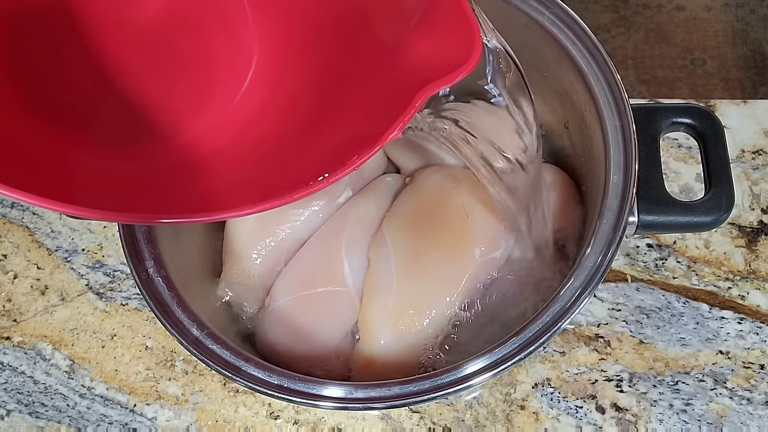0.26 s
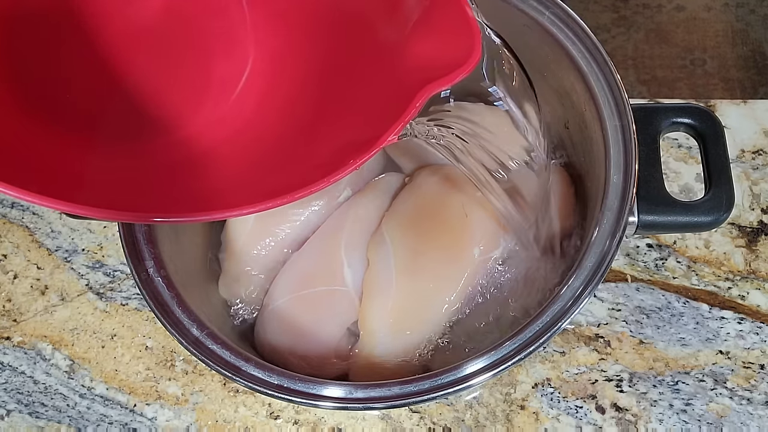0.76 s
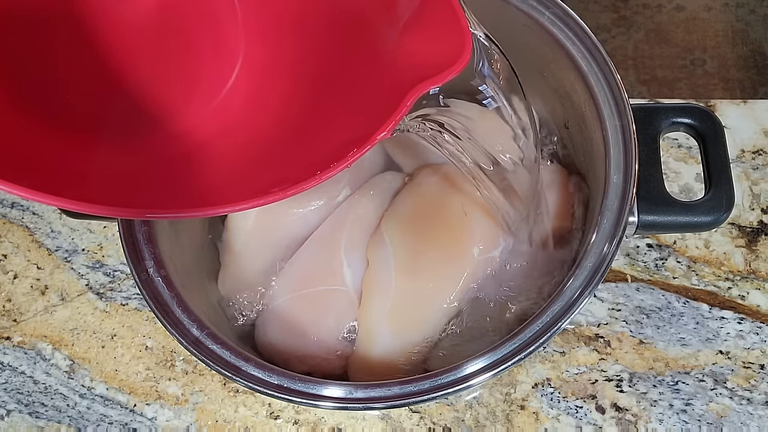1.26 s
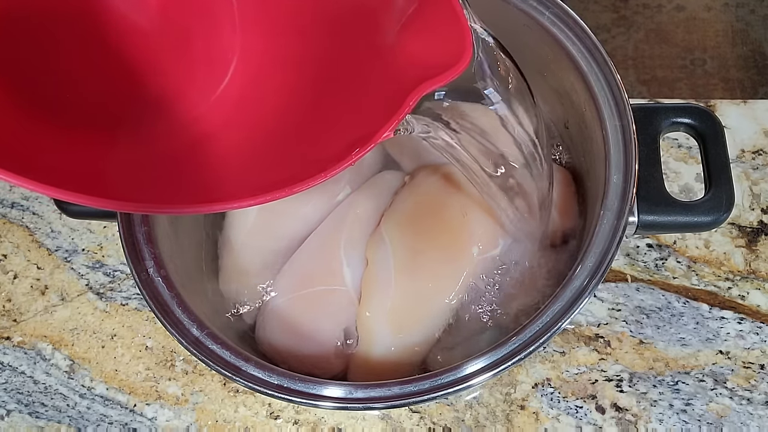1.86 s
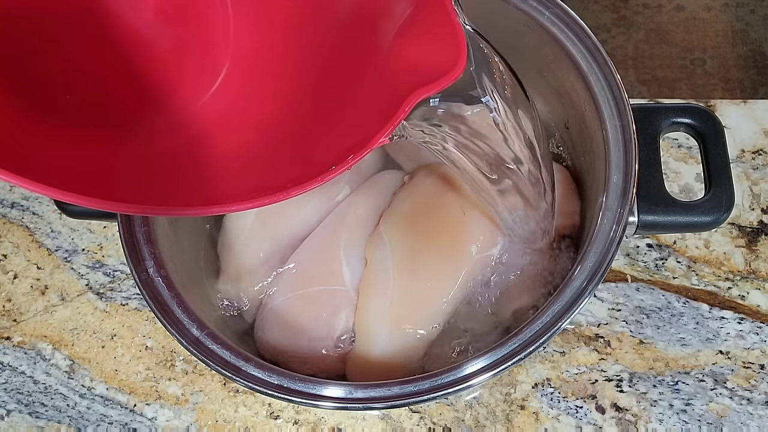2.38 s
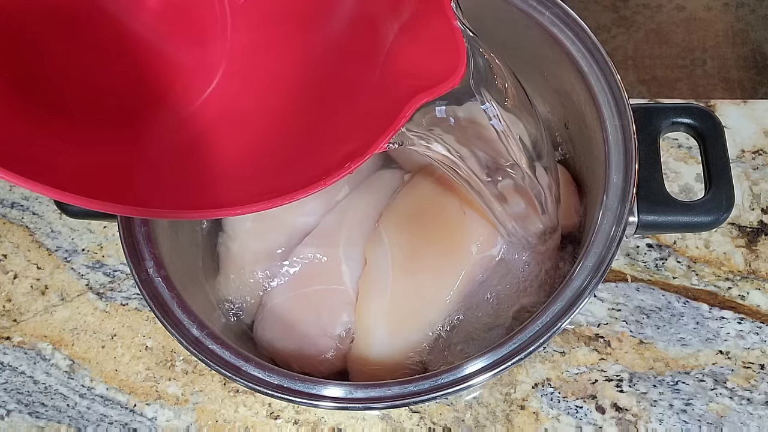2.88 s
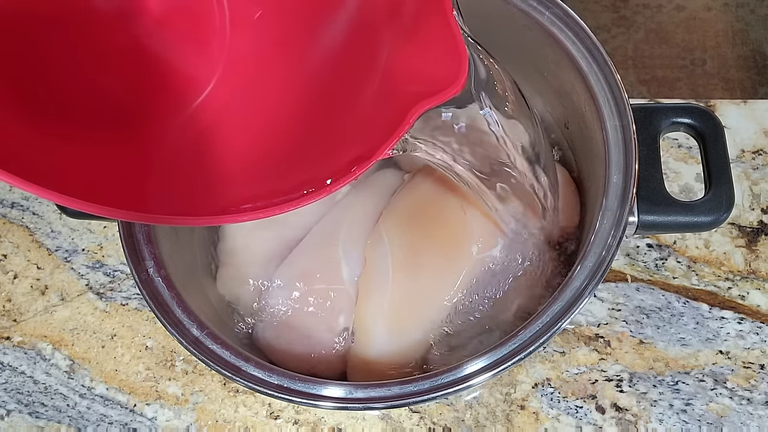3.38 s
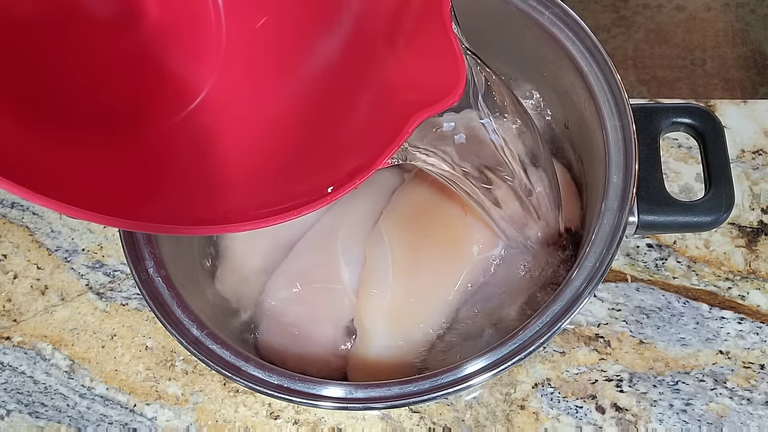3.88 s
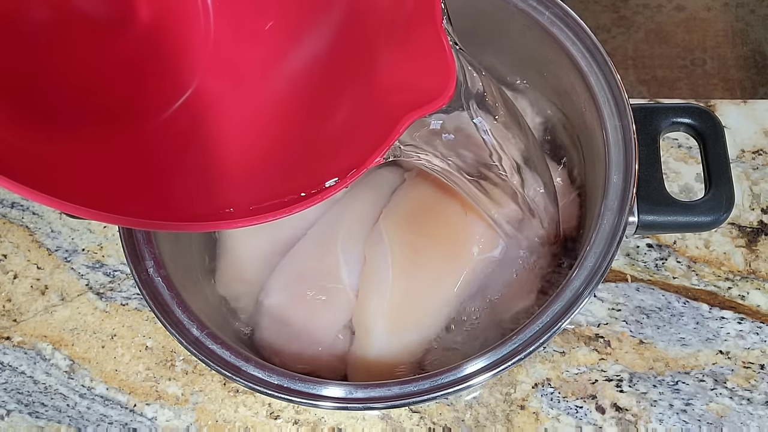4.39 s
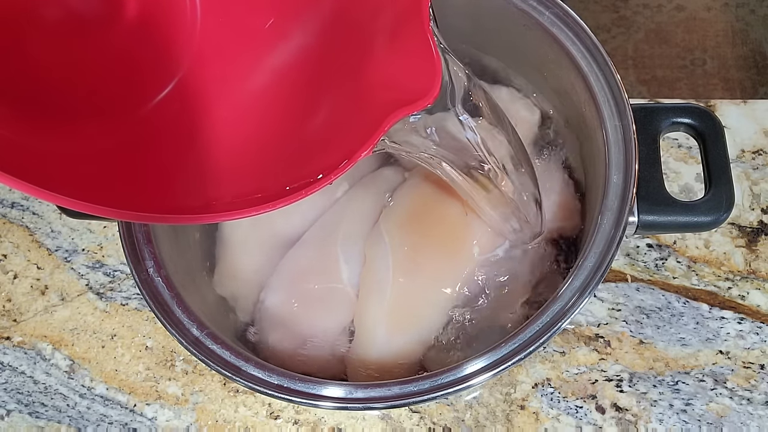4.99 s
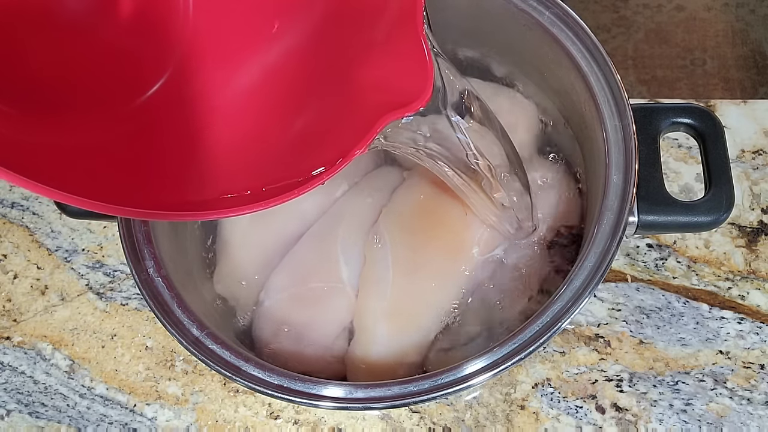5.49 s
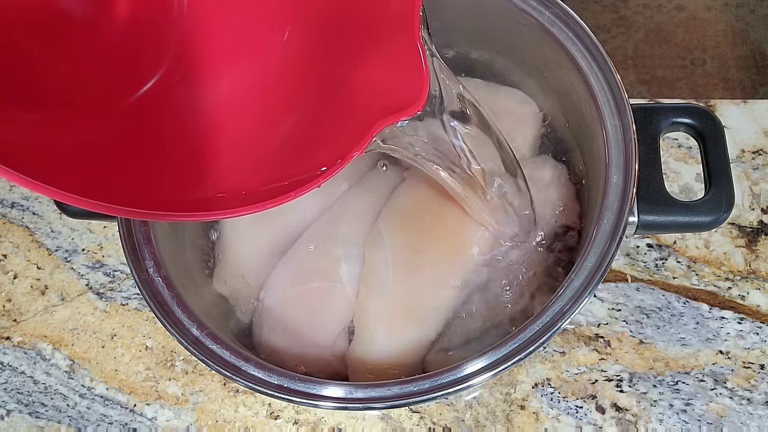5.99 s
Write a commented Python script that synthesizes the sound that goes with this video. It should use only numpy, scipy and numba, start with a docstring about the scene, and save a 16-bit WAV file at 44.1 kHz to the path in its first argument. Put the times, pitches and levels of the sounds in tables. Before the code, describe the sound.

Close-up pouring water, already running at the start, strikes meat and metal with crisp splatter and glassy bubble chirps. Over six seconds it calms in uneven surges to a smoother, quieter trickle with light gurgling, then swells slightly at the end. The pot adds a hollow, metallic colouring with short reflections. Behind it are a steady low electrical hum and soft room air, picked up by a nearby phone.

```python
"""Water pours from a plastic bowl over raw chicken into a steel stockpot near a phone; a hum runs throughout.
At first it strikes hard: bubbles ring as damped sines with bright plinks, spray fizzes as tiny high rings,
and drops tick as noise. As the pot fills, its air adds gliding resonances, gliding dips thin the splash, and
the wall scatters it as echoes. It softens as the water deepens; low bubbles churn where the stream folds under.
Near the end come two dull plops of escaping air. Steady sines make the hum, and shaped noise the kitchen air."""
import sys
import numpy as np
from scipy import signal
from scipy.fft import rfft, irfft
from scipy.io import wavfile
from scipy.ndimage import uniform_filter1d, map_coordinates
from numba import njit

SR = 44100
rng = np.random.default_rng(int(sys.argv[2]) if len(sys.argv) > 2 else 0)


def generate_wav(sig):
    """Save sig (samples, or channels by samples) to the path in sys.argv[1] as 16-bit PCM at SR."""
    pcm = np.round(np.clip(np.atleast_2d(sig).T, -1, 1) * 32767).astype(np.int16)
    wavfile.write(sys.argv[1], SR, pcm)


N = 275625
TIME = np.arange(N) / SR

# Levels are relative: the source functions and the pot scale them further.
# How hard the stream strikes, strongest at first, easing as the pool cushions it: [t/s, level/dB]
FORCE = [(0, 2.5), (0.6, -3.5), (1.5, -9), (2.4, -9), (2.7, -13.5), (3.25, -14), (3.48, -17), (3.7, -8.5),
         (4.25, -20), (4.42, -20), (5.05, -19), (5.3, -16), (5.55, -20), (5.7, -24.5), (5.95, -17),
         (6.25, -10.5)]
# Swells where the stream wobbles and drags under a bubble cloud:
# [peak t/s, half length/s, level/dB, commonest f/Hz]
SURGES = [(0.237, 0.13, -33, 4860), (0.437, 0.11, -52, 2170), (0.502, 0.026, -34.5, 4400),
          (0.74, 0.042, -41.5, 1370), (0.871, 0.082, -35, 4140), (1.32, 0.025, -47, 1380),
          (1.15, 0.2, -37, 4770), (1.382, 0.028, -34, 3850), (1.614, 0.086, -34.5, 3520),
          (1.68, 0.013, -43, 1300), (1.953, 0.16, -39, 3310), (2.152, 0.078, -33.5, 3600),
          (2.174, 0.018, -36.5, 1700), (2.252, 0.011, -35.5, 5100), (2.283, 0.022, -33.5, 4260),
          (2.494, 0.11, -55.5, 6500), (2.773, 0.03, -42.5, 1710), (3.05, 0.11, -43, 3630),
          (3.17, 0.032, -35, 3720), (3.34, 0.066, -45.5, 3780), (3.391, 0.075, -52.5, 1000),
          (3.702, 0.021, -46.5, 2430), (3.783, 0.053, -40, 3500), (4.026, 0.047, -41.5, 2850),
          (4.122, 0.051, -38.5, 3200), (4.506, 0.2, -46, 3000), (4.63, 0.11, -40.5, 3600),
          (4.884, 0.056, -46, 3500), (4.995, 0.06, -55, 3900), (5.156, 0.041, -44, 3200),
          (5.25, 0.053, -55, 3680), (5.54, 0.064, -50, 5160), (6.159, 0.08, -39, 3300)]
# Large bubbles, which fade once the pool closes over the meat: [t/s, level/dB]
GURGLE = [(0, -54.5), (0.5, -58.5), (1.1, -61.5), (1.4, -65.5), (2.6, -67.5), (3.5, -73.5), (4.15, -64.5),
          (4.45, -76), (5.2, -88.5), (6.25, -78)]
# Fine spray, with lulls where the stream slides in smoothly: [t/s, level/dB]
SPRAY = [(0, -42.5), (0.36, -46), (0.42, -54.5), (0.51, -48), (0.55, -58), (0.62, -49), (0.695, -63.5),
         (0.715, -48.5), (0.85, -52.5), (1.2, -58), (1.27, -62), (1.41, -57), (1.44, -56), (1.65, -53),
         (1.8, -58.5), (2.1, -53), (2.23, -53), (2.258, -50.5), (2.32, -57.5), (2.5, -55), (2.88, -64.5),
         (3.2, -61.5), (3.47, -65.5), (3.7, -60), (4.15, -61.5), (4.24, -66), (4.47, -73), (4.62, -58),
         (4.95, -60.5), (5.55, -63), (5.72, -67.5), (5.95, -60)]
# Big drops that slap down: [t/s, level/dB, t60/s, centre f/Hz]
SPLATS = [(0.499, -30, 0.017, 6500), (0.609, -24, 0.0066, 6000), (0.623, -22, .01, 5030),
          (0.715, -32.5, 0.03, 6500), (0.8144, -22, 0.008, 5000), (0.818, -22.5, 0.01, 4940),
          (0.8675, -23, 0.0044, 4660), (0.9625, -26, 0.0076, 4000), (0.996, -24, .005, 3600),
          (1.0502, -29, 0.011, 6500), (1.107, -22, 0.018, 4700), (1.125, -24.5, 0.0099, 5770),
          (1.171, -29, 0.007, 9000), (1.411, -20, 0.0055, 5000), (1.421, -30, .005, 11000),
          (1.5673, -27, 0.0065, 4370), (2.0663, -25, .008, 4970), (2.091, -38, 0.0088, 7000),
          (2.1525, -19, .007, 4800), (2.1585, -19, 0.0087, 3770), (2.209, -21.5, .009, 5300),
          (2.2625, -22, 0.0051, 8000), (2.385, -38.5, .012, 9220), (2.45, -44, 0.0075, 6000),
          (2.751, -34.5, 0.029, 4740), (2.755, -37.5, .025, 12000), (2.887, -48, 0.0031, 4800),
          (2.938, -39, 0.037, 8400), (3.281, -37, 0.0096, 11000), (3.346, -35.5, 0.016, 9000),
          (3.906, -31.5, 0.029, 5440), (3.909, -45, 0.017, 12000), (4.333, -42.5, 0.02, 8500),
          (4.871, -37.5, 0.022, 4760), (5.224, -40, 0.011, 12000), (5.326, -41, 0.0073, 7000),
          (5.434, -32.5, 0.01, 5560)]
# Single bubbles that stand out: [t/s, level/dB, initial f/Hz]
PLINKS = [(0.1848, -3.5, 6530), (0.241, -17, 5300), (0.3015, -12.5, 3790), (0.308, -16, 3600),
          (0.344, -9.5, 3930), (0.372, -12.5, 4000), (0.3884, -14.5, 4250), (0.393, -21, 4300),
          (0.5058, -16, 7200), (0.714, -16, 6950), (0.847, -20, 4060), (0.8812, -11, 6500),
          (1.051, -11, 7000), (1.1078, -14, 4800), (1.163, -12.5, 7000), (1.223, -23, 6740),
          (1.3124, -18.5, 3420), (2.2555, -16, 6500), (2.8495, -22, 3520), (2.889, -27.5, 3680),
          (2.921, -36, 3030), (2.941, -22, 4060), (3.0066, -26.5, 3900), (3.348, -22, 6940),
          (3.383, -28, 3070), (3.781, -25.5, 2900), (4.503, -23.5, 4650), (5.248, -31, 4300),
          (5.4357, -34, 4080), (5.5, -34.5, 5240), (5.7757, -30.5, 5200), (5.816, -35, 5000),
          (5.8955, -31.5, 5000), (5.972, -23.5, 6900), (6.053, -26, 7050), (6.108, -27, 5260)]
# Low to bright rings in the pour, each with its own decay: [t/s, level/dB, initial f/Hz, t60/s]
POUR_RINGS = [(0.016, -32, 1020, 0.038), (0.035, -42, 890, 0.047), (0.21, -36, 1294, 0.042),
              (1.028, -38.5, 1330, 0.026), (1.819, -32, 1930, 0.05), (1.88, -42.5, 1390, 0.045),
              (2.171, -40.5, 1275, 0.068), (3.161, -40, 1010, 0.022), (3.69, -45, 1930, .04),
              (3.787, -47, 2050, 0.031), (4.02, -36, 2350, 0.04), (4.071, -43, 2900, .03),
              (4.097, -33, 3000, .03), (4.134, -30.5, 2570, 0.027), (4.406, -41.5, 2800, .035),
              (4.519, -39, 2380, .03), (4.633, -37, 1844, 0.049), (4.64, -42, 1520, 0.039),
              (4.666, -35.5, 1950, 0.079), (4.804, -40.5, 1870, 0.055), (4.862, -47.5, 1490, 0.043),
              (4.864, -41, 2040, 0.032), (4.956, -54, 3980, .06), (4.98, -51, 3960, .07),
              (5.042, -38, 2960, 0.04), (5.153, -43, 2240, 0.04), (5.602, -53, 1600, 0.033),
              (5.921, -59, 1505, 0.16), (6.084, -46.5, 1120, 0.035), (6.102, -35, 2370, 0.045),
              (6.134, -29, 2240, 0.038), (6.173, -28.5, 3240, 0.019)]
# Dull plops: [t/s, level/dB, initial f/Hz, t60/s]
PLOPS = [(4.983, -51, 537, 0.025), (4.984, -42.5, 730, 0.03), (5.034, -35, 400, 0.018),
         (5.036, -43, 706, 0.024), (5.039, -50, 1060, 0.031)]
# Churning where the stream folds into the pool: [peak t/s, level/dB, half length/s]
CHURNS = [(0.202, -65, 0.28), (0.73, -59, 0.042), (1.223, -59.5, 0.16), (1.682, -55, 0.032),
          (2.041, -56.5, 0.084), (2.218, -56.5, 0.043), (2.757, -66, 0.037), (3.14, -57, 0.045),
          (3.712, -59.5, 0.033), (3.94, -57.5, 0.088), (5.023, -54, 0.044), (6.048, -58.5, 0.039)]
# Air resonances of the pot, each strongest at one depth: [initial f/Hz, climb/(Hz/s), width/Hz,
# left level/dB, right level/dB, strongest t/s, half length/s]
POT_MODES = [(532, 2.5, 63, 8.5, 6.5, 3, 4.5), (905, 21, 30, 11.5, 3, 1.2, 4.9),
             (984, 5.5, 24, 17, 3.5, 2.6, 2.9), (1153, -3.5, 30, 12.5, 7, 3.8, 8),
             (1235, 52.5, 49, 4, 8.5, 1, 8.6), (1340, 20, 68, -7, 11.5, 1.2, 1.6),
             (1560, 5, 36, -1, 5, 5.8, 1.3), (1836, 9.5, 48, 9.5, -2.5, 3, 2.9),
             (2104, 3.5, 26, -13, -2, 5.5, 2.5), (2260, 14, 30, -3, 3.5, 2.9, 5.2),
             (2770, -25, 94, 0.5, -5, 4.3, 1.4), (3010, 0.5, 35, 0, 6, 3.3, 1.3),
             (3200, -15, 98, -4, 0.5, 1.1, 2.7), (3320, 23, 51, -15, -10, 4.6, 3.5),
             (3900, 25, 88, 5, -3.5, 4.1, 1.5), (4130, -11, 62, -10, -8, 0.8, 1.8),
             (4380, 7, 65, -10, 2, 1.1, 2), (5560, 0, 290, 4, -6, 6.3, 0.74),
             (6500, 106, 990, -5.5, -9, 0.9, 14)]
# Gliding dips in the colour of the splash: [initial f/Hz, climb/(Hz/s), width/Hz,
# level at centre/dB, deepest t/s, half length/s]
DIPS = [(1650, 22, 80, -7, 1.2, 2.6), (2770, -130, 170, -16, 1.8, 1.9), (2480, 2, 120, -9, 4.9, 0.8),
        (2880, 14, 84, -10, 2.5, 3.6), (3850, -19, 160, -5, 5.1, 3.5), (4620, -28, 130, -4, 1.2, 1.6),
        (6000, -2, 1200, -2.5, 2, 1.3)]
# Appliance hum: [f/Hz, rms level/dB]
HUM = [(53.5, -66.5), (107, -70.5), (120, -52.5), (160.4, -77)]
# Spectrum of the kitchen air: [f/Hz, relative level per Hz/dB]
AIR_SPECTRUM = [(15, -14), (26, -3), (40, -6), (55, 1.5), (95, 6), (135, 1.5), (210, -3.5), (290, -10.5),
                (450, -16), (900, -27.5), (2000, -26.5), (4000, -17.5), (10000, -34.5), (15500, -23.5)]

AIR_DB = -55
PORT_LAG_S = 0.0002034  # the pot lies to the left, so the right microphone hears it later
TOP_HZ = 15850
SURGE_DB_PER_OCTAVE = 16  # a cloud thins out away from its commonest pitch
SURGE_RELEASE = 0.76  # a cloud dies in this share of the time it takes to swell
PLINK_CYCLES, PLINK_CYCLES_PER_S = 19.5, 0.96  # t60 in cycles, growing as the water deepens


def stream(spatter_db=-6, crackle_db=-8, patter_db=-7, flutter_db=0.49, flutter_rate=45):
    """Superposition: bubble swarms, spray and droplet ticks add up, and share one random flutter."""
    large_db = bubbling(GURGLE, hz=1120, surge_db=-10.0)
    middling_db = bubbling(FORCE, hz=2240, steady_db=-48.0, surge_db=-3.5, fade_db=-0.14)
    small_db = bubbling(FORCE, hz=4670, steady_db=-42.5, surge_db=-6.0)
    spray_db = bubbling(SPRAY, hz=11000, surge_db=0.5)

    large = swarm(large_db, 791.0, 1673, rate=1400, cycles=55, spread_db=2.5, clump_db=1.5,
                  patch_db=6.5, slope=-0.05, lag_s=.00008, slope_drift=0.21, thinning=0.2)
    middling = swarm(middling_db, 1644, 3068, rate=1200, cycles=72, rise=0.04, spread_db=2.5, clump_db=1.0,
                     patch_db=3.5, slope=1.98, lag_s=0.00014, slope_drift=-0.09, thinning=.5)
    small = swarm(small_db, 2788, 7705, rate=3000, cycles=40.5, rise=0.02, spread_db=3.5, clump_db=1.7,
                  patch_db=3.0, slope=0.44, lag_s=PORT_LAG_S, slope_drift=-0.23, thinning=0.46)
    spray = swarm(spray_db, 6650, 17760, rate=3200, cycles=34, spread_db=2.6, clump_db=2.4,
                  patch_db=3.0, slope=0.55, lag_s=PORT_LAG_S, thinning=.45)

    fine_spatter = spatter(rate=78, spread_db=2, t60=0.0023, lo_hz=4000, hi_hz=17500)
    patter = spatter(rate=240, spread_db=5.5, t60=0.0037, lo_hz=2900, hi_hz=7000)
    crackle = spatter(rate=260, spread_db=4.5, t60=0.0022, lo_hz=1580, hi_hz=3600)

    layers = [(large, large_db), (middling, middling_db), (small, small_db), (spray, spray_db),
              (fine_spatter, spray_db + spatter_db), (patter, small_db + patter_db),
              (crackle, middling_db + crackle_db)]
    flutter = undb(flutter_db * walk(flutter_rate))
    pour = sum(unit(layer) * undb(level_db) for layer, level_db in layers)
    return flutter * pour + stray_plinks(small_db)


def bubbling(curve, hz, surge_db, steady_db=0, fade_db=0):
    """Addition of powers: a steady curve, fading by fade_db each second, plus surges near one pitch, in dB."""
    steady = steady_db + np.interp(TIME, *np.transpose(curve)) + fade_db * TIME
    power = undb(steady) ** 2
    for peak_s, length, level_db, centre_hz in SURGES:
        near = slice(*np.searchsorted(TIME, [peak_s - 4 * length, peak_s + 4 * length]))
        t = TIME[near] - peak_s
        swell = np.exp(-(t / np.where(t < 0, length, length * SURGE_RELEASE)) ** 2)
        octaves_away = abs(np.log2(hz / centre_hz))
        power[near] += swell * undb(level_db + surge_db - SURGE_DB_PER_OCTAVE * octaves_away) ** 2
    return 10 * np.log10(power)


def swarm(level_db, lo_hz, hi_hz, rate, cycles, spread_db, clump_db, patch_db, slope, lag_s,
          slope_drift=0, thinning=.3, rise=0.064, pinch=0.58, clump_rate=70, patch_rate=30,
          lag_spread=.000015, lag_growth=.00001, echo_db=-7):
    """Random superposition: bubbles of many sizes shed in clumps by the wobbling stream, fewer when it is weak."""
    count = int(rate * N / SR)
    when, pitch, luck, wall, angle = rng.random((count, 5)).T
    loud, ringing, place = np.clip(rng.standard_normal((count, 3)).T, -2, 2)
    sample = (when * N).astype(int)
    start = sample / SR
    hz = lo_hz * (hi_hz / lo_hz) ** pitch
    # strong bubbles sit deeper and ring longer
    t60 = cycles * np.exp(.35 * ringing + 0.19 * loud) / hz
    # each fold of the stream favours a few bubble sizes for a moment, which makes the gurgle
    favour = np.clip(rng.standard_normal((512, 6)), -2, 2)
    patch = map_coordinates(favour, [start * patch_rate, pitch * 5], order=1, mode="mirror")
    clump = np.clip(walk(clump_rate), -2, 2)[sample]
    # a weaker pour keeps a smaller share, each bubble scaled up to hold the swarm's power
    share = undb(thinning * (level_db - level_db.max()))[sample]
    kept = (luck < share) / np.sqrt(share)
    # the balance between high and low bubbles shifts as the pot fills
    balance = (hz / np.sqrt(lo_hz * hi_hz)) ** (slope + slope_drift * start)
    size = undb(spread_db * loud + clump_db * clump + patch_db * patch) * balance * kept
    # as the pool grows, the bubbles spread over more of the pot
    direct_lag = lag_s + (lag_spread + lag_growth * start) * place
    direct = ring(start, size, hz, t60, direct_lag, rise, float(pinch))
    # the steel wall returns each bubble about a millisecond later, from another direction
    echo_start = start + 0.000516 + 0.001092 * wall
    echo_lag = 2 * PORT_LAG_S * (2 * angle - 1)
    echo = ring(echo_start, size * undb(echo_db), hz, t60, echo_lag, rise, float(pinch))
    return band(direct + echo, 1.143 * lo_hz, 1.54 * hi_hz)


@njit
def ring(start, size, hz, t60, lag, rise, pinch):
    """Damped oscillation: each ring swells over `pinch` cycles and rises in pitch; the right channel lags."""
    out = np.zeros((2, N))
    for k in range(len(start)):
        for c in range(2):
            t0 = start[k] + c * lag[k]
            first = max(int(t0 * SR) + 1, 0)
            last = min(int((t0 + t60[k]) * SR), N)
            for i in range(first, last):
                t = i / SR - t0
                age, cycles = t / t60[k], t * hz[k]
                envelope = min(cycles / pinch, 1.) * np.exp(-6.9 * age)
                out[c, i] += size[k] * envelope * np.sin(2 * np.pi * cycles * (1 + rise * age))
    return out


def spatter(rate, spread_db, t60, lo_hz, hi_hz):
    """Random arrivals: droplets land at `rate` per second on average, each a decaying burst."""
    strength = undb(spread_db * np.clip(rng.standard_normal(N), -2, 1.5))
    hits = (rng.random(N) < rate / SR) * strength
    decay_per_sample = undb(-60 / (t60 * SR))
    return ticks(signal.lfilter([1], [1, -decay_per_sample], hits), lo_hz, hi_hz)


def ticks(bursts, lo_hz, hi_hz):
    """Impact noise: a droplet breaking on steel or meat gives a sharp, broad tick, later at the right."""
    x = band(bursts * rng.standard_normal(len(bursts)), lo_hz, hi_hz)
    return np.array([x, np.roll(x, int(PORT_LAG_S * SR))])


def splats(octaves=0.45):
    """Impact noise of big drops: decaying bands that reach some octaves either side of their centres."""
    out, t = np.zeros((2, N)), TIME[:SR // 10]
    for s, level_db, t60, hz in SPLATS:
        start = int(s * SR)
        burst = undb(level_db - 60 * t / t60)
        out[:, start:start + len(t)] += ticks(burst, hz / 2 ** octaves, hz * 2 ** octaves)
    return out


def single_rings(plink_db=1, pour_ring_db=-2, plop_db=-3.5):
    """Damped resonance: bright plinks, low to bright rings, and dull plops of air escaping between the meat."""
    bright = undb(plink_db) * plinks(*np.transpose(PLINKS))
    pour_rings = undb(pour_ring_db) * damped_rings(*np.transpose(POUR_RINGS), rise=0.032, pinch=2.0)
    plops = undb(plop_db) * damped_rings(*np.transpose(PLOPS), rise=0.066, pinch=1.0)
    return bright + pour_rings + plops


def stray_plinks(level_db, rate=7, above_db=7, spread_db=2, lo_hz=2900, hi_hz=7200):
    """Chance resonance: `rate` times a second on average a surface bubble rings out above its neighbours."""
    when, pitch, luck = rng.random((int(rate * N / SR), 3)).T
    sample = (when * N).astype(int)
    plink_db = level_db[sample] + above_db + spread_db * (2 * luck - 1)
    return plinks(sample / SR, plink_db, lo_hz * (hi_hz / lo_hz) ** pitch)


def plinks(s, db, hz):
    """Light damping: small bright bubbles ring for a few more cycles as the pot fills."""
    t60 = (PLINK_CYCLES + PLINK_CYCLES_PER_S * s) / hz
    return damped_rings(s, db, hz, t60, rise=0.0094, pinch=2.95)


def damped_rings(s, db, hz, t60, rise, pinch):
    """Damped oscillation of single rings from the pot, all with the same lag to the right."""
    lag = np.full(len(s), PORT_LAG_S)
    return ring(1. * s, undb(db), 1. * hz, 1. * t60, lag, rise, float(pinch))


def churn(churn_db=-11.5, steady_db=-66, fade_db=-2):
    """Entrainment: big low bubbles swell where the stream folds under, over a burble losing fade_db a second."""
    swells = sum(undb(2 * db) * np.exp(-((TIME - s) / length) ** 2) for s, db, length in CHURNS)
    burble = undb(2 * (steady_db + fade_db * TIME))  # doubled dB give power
    level_db = 10 * np.log10(swells + burble)
    big = swarm(level_db, 408, 772, rate=500, cycles=18, spread_db=3.0, clump_db=1.5, patch_db=1.5,
                slope=0.081, lag_s=0.00022, thinning=0.065)
    return unit(big) * undb(level_db + churn_db)


def in_pot(x, scatter_db=-6.0, scatter_t60=0.067, kitchen_db=-19, kitchen_t60=1.0,
           shade_db=-3.5, shade_hz=2400):
    """Resonance and reflection: direct sound, ringing air, gliding dips, wall scatter and a faint kitchen tail."""
    ringing = np.zeros((2, N))
    for hz, climb, width, left_db, right_db, s, length in POT_MODES:
        ringing += undb([[left_db], [right_db]]) * swelling_mode(x, hz, climb, width, s, length)
    heard = x + ringing + undb(scatter_db) * wall_scatter(x, scatter_t60)
    for hz, climb, width, db, s, length in DIPS:
        heard = heard + (undb(db) - 1) * swelling_mode(heard, hz, climb, width, s, length)
    left, right = heard + undb(kitchen_db) * reflections(x, kitchen_t60)
    # the body of the phone shades the right microphone from the treble
    bass = signal.lfilter(*signal.butter(1, shade_hz, fs=SR), right)
    return np.array([left, bass + undb(shade_db) * (right - bass)])


def swelling_mode(x, hz, climb, width, s, length):
    """Selective response: a gliding band at both microphones that comes and goes around time s."""
    mode = np.array([air_column(side, float(hz), float(climb), float(width)) for side in x])
    return mode * np.exp(-((TIME - s) / length) ** 2)


@njit
def air_column(x, hz, climb, width):
    """Resonance, as of the air above the water, gliding as the level rises; gain 1 at its centre."""
    out = np.zeros(N)
    b, low, g, k, scale = 0., 0., 0., 0., 0.  # two filter states, then coefficients
    for i in range(N):
        if i % 256 == 0:  # retune
            f = hz + climb * i / SR
            g, k = np.tan(np.pi * f / SR), width / f
            scale = 1 / (1 + g * (g + k))
        v = (b + g * (x[i] - low)) * scale
        b, low = 2 * v - b, low + 2 * g * v
        out[i] = k * v
    return out


def wall_scatter(x, t60, wander_rate=7, count=4):
    """Scattering: the splash wanders between spots in the pot, each with its own pattern of echoes."""
    spots = np.array([walk(wander_rate) for _ in range(count)])
    shares = spots / np.linalg.norm(spots, axis=0)
    return sum(reflections(x * share, t60) for share in shares)


def reflections(x, t60, lo_hz=820, hi_hz=13000, build_s=0.0012):
    """Reverberation: convolution with decaying noise, different at each microphone, cut off by 0.25 s."""
    t = TIME[:int(min(t60, 1 / 4) * SR)]
    noise = band(rng.standard_normal((2, SR // 4)), lo_hz, hi_hz)[:, :len(t)]
    tail = noise * undb(-60 * t / t60) * (1 - np.exp(-t / build_s))
    tail = tail / np.sqrt(np.sum(tail ** 2) / 2)
    return signal.oaconvolve(x, tail, axes=1)[:, :N]


def kitchen(wide_hz=900, right_db=0.9):
    """Periodic and random sound: steady motor and mains tones over air noise, more alike in the bass."""
    hum = sum(np.sqrt(2) * undb(db) * np.sin(2 * np.pi * (hz * TIME + rng.random())) for hz, db in HUM)
    f = np.maximum(np.fft.rfftfreq(N, 1 / SR), 1)
    points, db = np.transpose(AIR_SPECTRUM)
    shape = undb(np.interp(np.log(f), np.log(points), db))
    mid, side = rfft(rng.standard_normal((2, N))) * shape
    width = np.clip(f / wide_hz, .15, 1)
    air = irfft(mid + np.array([[1], [-1]]) * side * width, N)
    return (hum + undb(AIR_DB) * unit(air)) * undb([[-right_db], [right_db]])


def undb(db):
    """Logarithmic level: decibels to amplitude gain."""
    return 10 ** (np.asarray(db) / 20)


def unit(x):
    """Normalisation: scale a sound to rms 1."""
    return x / np.std(x)


def band(x, lo_hz, hi_hz, order=2):
    """Band limitation: a Butterworth band-pass."""
    edges = [lo_hz, min(hi_hz, .48 * SR)]
    return signal.sosfilt(signal.butter(order, edges, "band", fs=SR, output="sos"), x)


def walk(rate):
    """Random modulation: about `rate` new values a second, joined by straight slopes; spread near 1."""
    k = max(int(SR / rate), 2)
    held = np.repeat(rng.standard_normal(N // k + 1), k)
    return np.sqrt(1.5) * uniform_filter1d(held, k)[:N]


def scene():
    """Superposition of the pour in its pot and the kitchen around it."""
    return in_pot(stream() + churn() + single_rings() + splats()) + kitchen()


def record(dry):
    """Low-pass filtering: the phone cuts the top."""
    return signal.sosfilt(signal.ellip(10, .2, 70, TOP_HZ, fs=SR, output="sos"), dry)


dry = scene()
out = record(dry)
generate_wav(out)
```